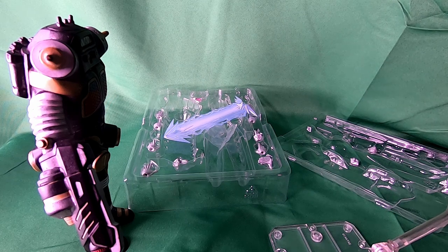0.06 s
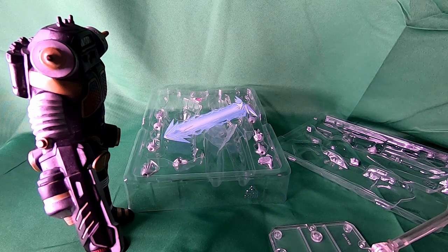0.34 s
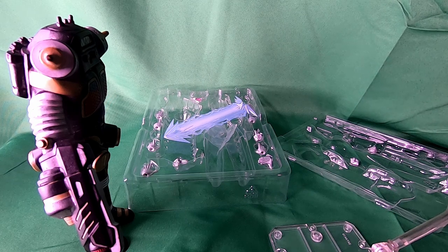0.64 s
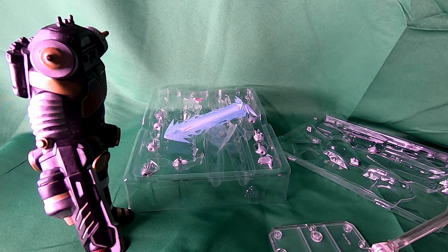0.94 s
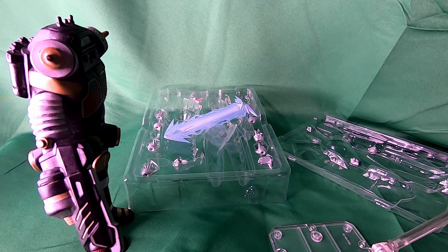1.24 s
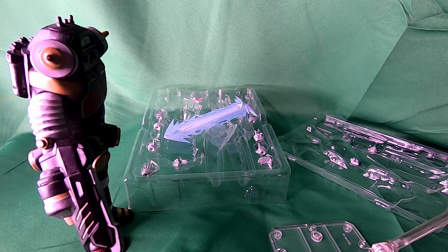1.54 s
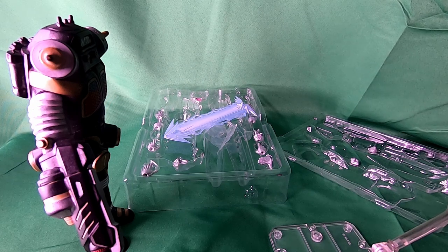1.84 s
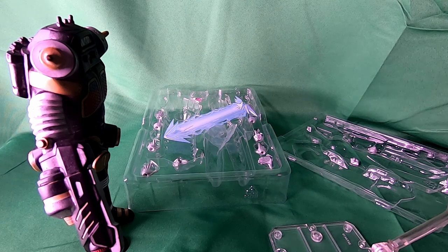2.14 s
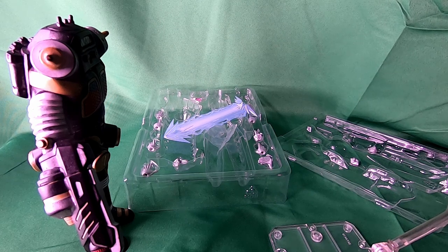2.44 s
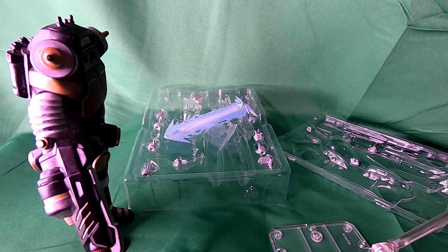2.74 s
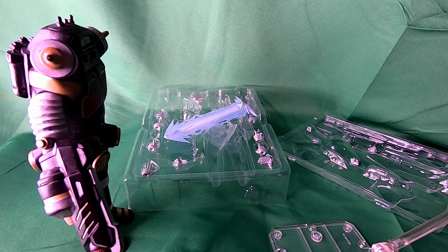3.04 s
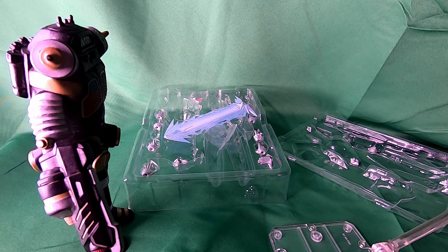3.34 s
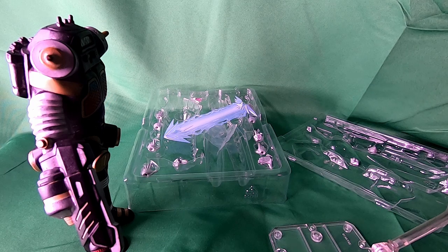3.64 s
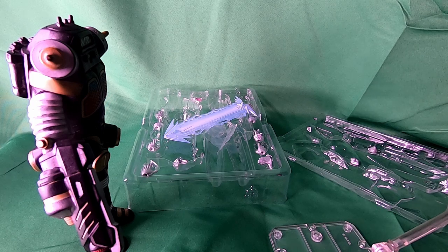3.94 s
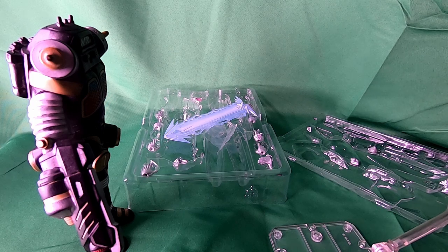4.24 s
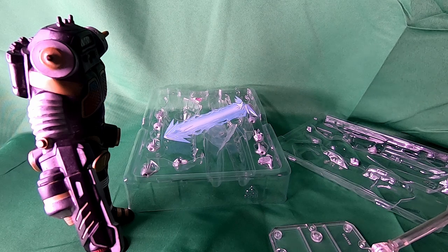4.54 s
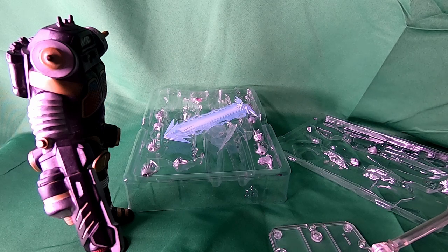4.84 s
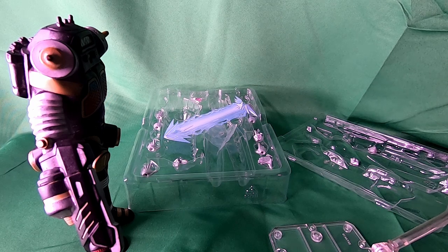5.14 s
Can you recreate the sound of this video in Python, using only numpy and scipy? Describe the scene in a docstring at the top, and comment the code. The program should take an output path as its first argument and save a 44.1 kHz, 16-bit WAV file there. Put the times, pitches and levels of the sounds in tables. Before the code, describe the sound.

Light plastic clicks and finger rustles in a small room, followed by a sliding, knocking box and one loud clack, with a fan humming faintly.

```python
"""Light taps on thin clear trays sound over a humming fan, a little way off in a small, live room.
Fingers rustle over the trays and small plastic toy parts click, each impact exciting their damped modes.
A box slides with stick-slip friction and is bumped; at the end something is put down with a loud clack.
The microphone faces away, so the reflection from a near wall is stronger than the direct sound."""
import sys
import numpy as np
from scipy import signal
from scipy.fft import rfft, irfft, next_fast_len
from scipy.io import wavfile
from scipy.ndimage import uniform_filter1d

SR = 44100
rng = np.random.default_rng(int(sys.argv[2]) if len(sys.argv) > 2 else 0)


def persist_wave(psi):
    """Save psi, clipped to +-1, as 16-bit WAV."""
    counts = np.round(np.clip(psi, -1, 1) * 32767).astype(np.int16)
    wavfile.write(sys.argv[1], SR, np.atleast_2d(counts).T)


N = 237779
TIME = np.arange(N) / SR
BALANCE_DB = [[0.64], [-0.64]]   # left, right

# modes of a tray and of a toy part in the room: (frequency [Hz], level [dB], T60 [s])
TRAY_MODES = [(1650, 1.5, 0.25), (1740, -1.5, 0.44), (1786, -5.5, 0.57), (2454, -10, 0.25),
              (2990, -13, 0.22), (3540, -14, 0.45), (4484, -13.5, 0.32), (8100, -27, 0.42)]
PART_MODES = [(967, -6.5, 0.24), (1787, 3.5, 0.14), (1906, 3.5, 0.27), (2050, -2, 0.48), (2235, 4.5, 0.23),
              (3170, -28, 0.35), (3880, -42, .26), (4270, -26, 0.2), (4700, -4.5, 0.37), (5370, -17, .25)]
# spectrum of a hard contact: (frequency [Hz], density level [dB])
CRACK_SPECTRUM = [(60, -31), (300, 1), (900, 6), (1500, 2), (2700, -4), (4000, -5.5), (5500, -15.5),
                  (8000, -16), (10000, -18.5), (11500, -28.5), (15000, -39)]


def from_db(db):
    """Amplitude ratio of a level."""
    return 10 ** (np.asarray(db) / 20)


def unit_rms(x):
    """Normalise to rms 1."""
    return x / np.sqrt(np.mean(x ** 2) + 1e-30)


def blow(x, db, span_s=0.075):
    """Equivalent level: give a transient the energy of a steady sound lasting span_s."""
    return x * from_db(db) * np.sqrt(span_s * SR / np.sum(x ** 2))


def at_hz(points, hz):
    """Interpolate on a log-frequency axis."""
    f, value = np.transpose(points)
    return np.interp(np.log(np.maximum(hz, 1)), np.log(f), value)


def add(track, s, sound):
    """Superpose a sound at time s."""
    i = max(round(s * SR), 0)
    track[..., i:i + sound.shape[-1]] += sound[..., :max(N - i, 0)]


def colour(x, spectrum, size=4096):
    """Minimum-phase filter: folding the cepstrum makes the response causal."""
    cepstrum = irfft(np.log(from_db(at_hz(spectrum, np.fft.rfftfreq(size, 1 / SR)))))
    cepstrum[1:size // 2] *= 2
    cepstrum[size // 2 + 1:] = 0
    response = irfft(np.exp(rfft(cepstrum)))
    return np.apply_along_axis(lambda v: signal.fftconvolve(v, response)[:len(v)], -1, x)


def resonate(x, hz, width_hz):
    """Forced response of a damped oscillator."""
    r = np.exp(-np.pi * width_hz / SR)
    return signal.lfilter([1, 0, -1], [1, -2 * r * np.cos(2 * np.pi * hz / SR), r * r], x)


def diffuse(size):
    """Diffuse field: noise from all sides, coherent between the channels in the bass, less so above."""
    # left-right likeness: (frequency [Hz], correlation [-])
    coherence = [(60, 0.87), (200, 0.92), (400, 0.51), (750, -0.15), (1300, -0.099), (2400, 0.53),
                 (4400, 0.59), (8000, 0.069), (15000, -0.36)]
    padded = next_fast_len(size)
    alike = np.clip(at_hz(coherence, np.fft.rfftfreq(padded, 1 / SR)), -.98, .98)
    mid, side = rfft(rng.standard_normal((2, padded)))
    spectra = np.sqrt(1 + alike) * mid + np.sqrt(1 - alike) * side * [[1], [-1]]
    return unit_rms(irfft(spectra, padded)[:, :size])


def arrival(delay_s, smear_s, scatter, dull_hz):
    """Scattering: a clean pulse is trailed by treble deflected from things along its path."""
    t = TIME[:SR // 2] - delay_s
    spray = unit_rms(diffuse(len(t)) * (t >= 0) * np.exp(-np.abs(t) / smear_s)) / np.sqrt(len(t))
    path = scatter * signal.sosfilt(signal.butter(1, 800, "high", fs=SR, output="sos"), spray)
    path[:, round(delay_s * SR)] += 1
    path /= np.sqrt(np.sum(path ** 2) / 2)
    return signal.sosfilt(signal.butter(2, dull_hz, fs=SR, output="sos"), path)


def room_response(direct_db=-10.5, wall_db=-8.5, tail_db=-4, build_s=0.01):
    """Impulse response: shaded direct sound, an early wall reflection, then diffuse reverberation."""
    # reverberation time: (frequency [Hz], T60 [s])
    decay_times = [(150, 0.36), (600, 0.27), (2000, 0.32), (5000, 0.31), (12000, 0.32)]
    t = TIME[:SR // 2]
    centres, t60s = np.transpose(decay_times)
    noise, hz = rfft(diffuse(len(t))), np.fft.rfftfreq(len(t), 1 / SR)
    tail = 0
    for weights, t60 in zip(np.eye(len(centres)), t60s):
        band = irfft(noise * at_hz(np.c_[centres, weights], hz), len(t))
        tail += band * np.exp(-np.log(1000) * t / t60)
    tail = unit_rms(tail * (1 - np.exp(-(t / build_s) ** 2))) / np.sqrt(len(t))
    direct = arrival(0, smear_s=0.0054, scatter=3.0, dull_hz=5600)
    wall = arrival(0.0095, smear_s=0.0075, scatter=2.5, dull_hz=9800)
    response = from_db(direct_db) * direct + from_db(wall_db) * wall + from_db(tail_db) * tail
    return response * from_db(BALANCE_DB)


def in_room(x, response):
    """Convolution carries a source to both channels."""
    return signal.fftconvolve(x[None], response, axes=1)[:, :N]


def fan(sway_db=-12, fade_db_per_s=0.4):
    """Broadband air noise, with a drone and hum of narrowband noise that waver, sway and slowly fade."""
    # moving air: (frequency [Hz], density level [dB re 1/Hz])
    air_spectrum = [(25, -100), (50, -86), (75, -99), (100, -99.5), (150, -84), (200, -82), (260, -80),
                    (400, -88.5), (600, -94.5), (1300, -91), (2000, -103), (2800, -109), (4400, -111),
                    (6000, -122), (8500, -126), (12000, -139), (15000, -142)]
    # drone and hum: (frequency [Hz], nominal bandwidth [Hz], level at mid-scene [dB])
    hum_bands = [(44.9, 1.9, -72), (197.7, 9.2, -55)]
    air = colour(diffuse(N), air_spectrum) * np.sqrt(SR / 2)
    hum = 0
    for hz, width, db in hum_bands:
        drive = diffuse(N + SR) + from_db(sway_db) * rng.standard_normal(N + SR) * [[1], [-1]]
        band = resonate(resonate(drive, hz, 2 * width), hz, 2 * width)
        hum += from_db(db) * unit_rms(band[:, SR:])   # steady state only
    fade = from_db(fade_db_per_s * (TIME.mean() - TIME))
    return (air + fade * hum) * from_db(BALANCE_DB)


def contact(chatter_s, slip_size=0.35, slips_per_s=3500):
    """Contact force: an impulse followed by a decaying run of tiny slips."""
    t = TIME[:SR // 4]
    slips = rng.standard_normal(len(t)) * (rng.random(len(t)) < slips_per_s / SR)
    force = slip_size * slips * np.exp(-t / chatter_s)
    force[0] = 1
    return force


def ring(modes, uneven_db=3.0, build_s=0.0054, apart_hz=700, blur_hz_at_1k=16):
    """Damped modes swell as the room fills; echoes blur their pitch and part the channels in phase."""
    t = TIME[:SR // 2]
    hz, db, t60 = np.transpose(modes)[:, :, None]
    strength = from_db(db + uneven_db * rng.standard_normal(hz.shape))
    apart = rng.choice([-1, 1], hz.shape) * hz / (hz + apart_hz) * np.pi / 4
    waver = unit_rms(uniform_filter1d(rng.standard_normal((len(hz), len(t))), size=400, axis=1))
    pitch = hz + blur_hz_at_1k * np.sqrt(hz / 1000) * waver
    phase = 2 * np.pi * (np.cumsum(pitch, axis=1) / SR + rng.random(hz.shape)) + np.array([apart, -apart])
    waves = np.sum(strength * np.sin(phase) * np.exp(-np.log(1000) * t / t60), axis=1)
    return waves * (1 - np.exp(-(t / build_s) ** 2)) * from_db(BALANCE_DB)


def strike(s, impacts, rings):
    """Transients (sound, dB) and free vibration (modes, dB) of one blow, from its own spot in the room."""
    out, room = np.zeros((2, N)), room_response()
    for sound, db in impacts:
        add(out, s, np.sqrt(2) * blow(in_room(sound, room), db))
    for modes, db in rings:
        add(out, s, np.sqrt(2) * blow(ring(modes), db))
    return out


def click(s, db, hz, edge_db, firm_body_db, rings, firm_db=-46):
    """Impact excitation: one force drives a pitched snap, a bright edge and a dull body; modes ring on."""
    # edge and body of a click: (frequency [Hz], density level [dB])
    edge_spectrum = [(1500, -26.5), (4500, 18.5), (6000, 11), (8500, 10.5), (10000, 2.5), (11200, -21.5),
                     (14500, -12.5)]
    body_spectrum = [(120, 5), (350, -16), (800, 9), (1200, 5), (2000, -12), (5000, -47), (10000, -59)]
    force = contact(chatter_s=0.0015 * 2 ** ((firm_db - db) / 8.5))   # lighter clicks skid for longer
    width_hz = hz * min(0.92 * 2 ** (edge_db / 21.5), 1)   # a brighter edge widens the snap
    low_hz = np.hypot(hz, width_hz / 2) - width_hz / 2
    snap = signal.sosfilt(signal.butter(2, [low_hz, low_hz + width_hz], "band", fs=SR, output="sos"), force)
    edge, body = colour(force, edge_spectrum), colour(force, body_spectrum)
    body_db = firm_body_db + 0.66 * (db - firm_db)
    return strike(s, [(snap, db), (edge, db + edge_db), (body, body_db)], rings)


def tray_taps(firm_body_db=-55, part_db=-6.5):
    """Coupled vibration: a part set against a thin tray rings the tray, and itself more weakly."""
    # (time [s], level [dB], snap pitch [Hz], edge [dB re level], ring [dB re level])
    taps = [(0.001, -58.5, 3480, -8.5, 3), (0.101, -63, 3530, -23, 7), (0.298, -61.5, 3100, -4.5, 0.5),
            (0.677, -59, 2820, -5.5, -10), (0.778, -74, 3440, 4, -9), (1.154, -64, 2330, -16, 0),
            (1.299, -45.5, 2400, -18.5, -10), (1.529, -68, 2100, -12, 0), (1.675, -55.5, 3150, -10, -2),
            (1.713, -65, 4100, -4.5, -1), (1.795, -75, 5260, -17, 1), (1.900, -72.5, 2900, -21, 4.5),
            (2.496, -71, 4080, -40, -10)]
    out = 0
    for s, db, hz, edge_db, ring_db in taps:
        rings = [(TRAY_MODES, db + ring_db), (PART_MODES, db + ring_db + part_db)]
        out += click(s, db, hz, edge_db, firm_body_db, rings)
    return out


def friction(per_s, spread_db=3.5):
    """Stick-slip friction: random impulses of uneven size."""
    sizes = from_db(spread_db * np.minimum(rng.exponential(1, N), 4)) * rng.choice([-1, 1], N)
    return sizes * (rng.random(N) < per_s / SR)


def finger_rustle():
    """Sparse stick-slip of fingers on the trays; each stroke swells and fades in a half sine."""
    # (start [s], duration [s], level at the crest [dB])
    strokes = [(0.408, .17, -58), (.62, 0.35, -63), (1.181, 0.3, -55.5), (1.696, .34, -64.5),
               (2.05, .65, -69.5), (3.866, 0.57, -64), (5.052, 0.15, -64.5)]
    envelope = sum(from_db(db) * np.sin(np.pi * np.clip((TIME - s) / length_s, 0, 1))
                   for s, length_s, db in strokes)
    return envelope * unit_rms(colour(friction(per_s=250), CRACK_SPECTRUM))


def part_clicks(firm_body_db=-65, tray_db=-6):
    """Hard parts collide and ring in their modes; a tray vibrates more weakly in sympathy."""
    # (time [s], level [dB], snap pitch [Hz], edge [dB re level], ring [dB re level])
    collisions = [(3.268, -54, 2620, -18.5, -7), (3.378, -48.5, 3330, -16.5, -10),
                  (3.530, -44, 3800, -12, -2.5), (3.616, -63, 3560, 1, 3.5),
                  (3.683, -49.5, 2920, -6.5, -7.5), (3.712, -45.5, 3100, -9.5, -8),
                  (3.904, -65.5, 2940, -8.5, -5)]
    out = 0
    for s, db, hz, edge_db, ring_db in collisions:
        rings = [(PART_MODES, db + ring_db), (TRAY_MODES, db + ring_db + tray_db)]
        out += click(s, db, hz, edge_db, firm_body_db, rings)
    return out


def near_tick(s=4.022, level_db=-59, decay_s=0.00072):
    """Direct field: a tiny scratch excites resonances so near that no reverberation is heard."""
    # (frequency [Hz], bandwidth per stage [Hz], level [dB re level_db])
    resonances = [(2170, 230, 0), (3900, 700, -10), (8300, 2500, -23), (10500, 1500, -24)]
    t = TIME[:SR // 10]
    force = rng.standard_normal(len(t)) * (t / decay_s) ** 2 * np.exp(-t / decay_s)
    out = np.zeros(N)
    for hz, width_hz, db in resonances:
        band = resonate(resonate(force, hz, width_hz), hz, width_hz)
        add(out, s, blow(band, level_db + db))
    return out


def push(s, length_s, attack_s=0.027, release_s=0.013, swell_db_per_s=25.5):
    """Amplitude envelope of a push that takes hold, presses ever harder, then lets go."""
    t = TIME - s
    hold = np.clip(t / attack_s, 0, 1) ** 2
    swell = from_db(swell_db_per_s * np.minimum(t - length_s, 0))
    release = np.exp(-np.maximum(t - length_s, 0) / release_s)
    return hold * swell * release


def box_slide(rumble_lag_s=0.018, sing_db=-17):
    """Dense stick-slip makes the sliding box hiss, rumble and sing faintly at one resonance."""
    # (start [s], duration [s], hiss target level [dB], rumble target level [dB])
    pushes = [(4.102, 0.48, -58, -76), (4.403, 0.18, -42.5, -35.5), (4.735, .022, -36.5, -28)]
    # sliding noise: (frequency [Hz], density level [dB])
    hiss_spectrum = [(50, -31), (200, 1.5), (600, -1), (1300, -1), (3000, -6), (5000, -12.5), (7000, -15.5),
                     (10000, -12), (11500, -25), (15000, -31)]
    rumble_spectrum = [(25, -35), (60, -2.5), (85, -18.5), (120, 2.5), (220, -5.5), (280, 0.5),
                       (400, -16.5), (530, -16), (800, -24), (3000, -63)]
    hiss_gain = sum(from_db(db) * push(s, length_s) for s, length_s, db, _ in pushes)
    rumble_gain = sum(from_db(db) * push(s + rumble_lag_s, length_s) for s, length_s, _, db in pushes)
    slips = friction(per_s=4200)
    hiss = unit_rms(colour(slips, hiss_spectrum))
    sing = from_db(sing_db) * unit_rms(resonate(slips, hz=2880, width_hz=120))
    rumble = unit_rms(colour(friction(per_s=1500), rumble_spectrum))
    return rumble_gain * rumble + hiss_gain * (hiss + sing)


def box_knocks(left_db=0.5):
    """Impact of box on table: a low thud, a hollow knock, a hard crack and free vibration of its walls."""
    # bumps and the last clack: (time [s], thud level [dB], hollow, ring, crack [each dB re thud])
    hits = [(4.370, -44.5, -9.5, -10.5, -17.5), (4.677, -58, 3.5, 1, -22), (4.734, -45.5, -2, -6, -6.5),
            (4.763, -43.5, 6, -6, -8), (5.271, -41.5, -7, -26, -21), (5.2821, -24, -4.5, 3.5, -2.5),
            (5.304, -31, -4, -4, 6)]
    # box walls in the room: (frequency [Hz], level [dB], T60 [s])
    box_modes = [(130.8, -1.5, 0.4), (161.6, 3, 0.29), (208.4, 3.5, 0.62), (264.2, -2, 0.47),
                 (380, 3.5, 0.13), (426, -5, 0.28), (468.8, 3.5, 0.27), (519.6, 1, 0.46), (585, -10, 0.7),
                 (626, -9, 0.21), (859, -3.5, 0.27), (1056, -3.5, 0.69), (1105, 0.5, 0.41),
                 (1204, -4, 0.43), (1264, 2, 0.39), (1329, 5.5, 0.24), (1604, -10, 0.46), (1593, -3.5, 0.5),
                 (1823, 4, 0.1), (2130, -29, 0.24), (2360, -18, 0.72), (2520, -20, 0.075),
                 (2890, -14, 0.53), (3120, -11.5, 1)]
    # thud and hollow knock: (frequency [Hz], density level [dB])
    thud_spectrum = [(25, -42), (60, -13.5), (85, -38), (130, -7), (200, 0), (320, -10.5), (600, -15),
                     (1200, -36), (4000, -62)]
    hollow_spectrum = [(50, -37), (200, -8.5), (450, 0), (620, 3.5), (850, -2), (1300, -13), (3000, -30.5),
                       (8000, -55)]
    out = 0
    for s, db, hollow_db, ring_db, crack_db in hits:
        # a square hit is hollow and clean; a glancing one rattles for longer
        force = contact(chatter_s=0.0022 * 2 ** (-hollow_db / 4))
        impacts = [(colour(force, thud_spectrum), db),
                   (colour(force, hollow_spectrum), db + hollow_db),
                   (colour(force, CRACK_SPECTRUM), db + crack_db)]
        out += strike(s, impacts, [(box_modes, db + ring_db)])
    return out * from_db([[left_db], [-left_db]])


def scene():
    """Superposition of impacts, friction and the fan."""
    impacts = tray_taps() + part_clicks() + near_tick() + box_knocks()
    rubbing = in_room(box_slide() + finger_rustle(), room_response())
    return impacts + rubbing + fan()


def record(dry, cutoff_hz=15000):
    """Band limiting: an elliptic low-pass cuts the top steeply."""
    return signal.sosfilt(signal.ellip(10, .1, 80, cutoff_hz, fs=SR, output="sos"), dry)


dry = scene()
out = record(dry)
persist_wave(out)
```